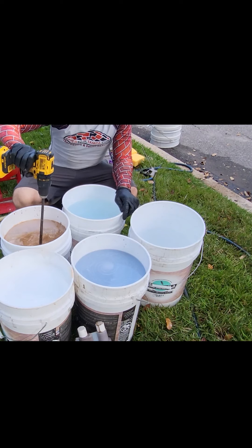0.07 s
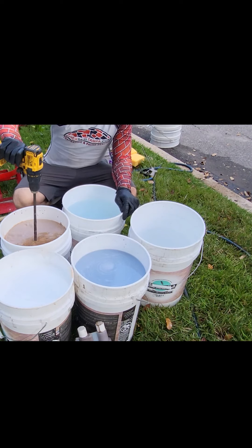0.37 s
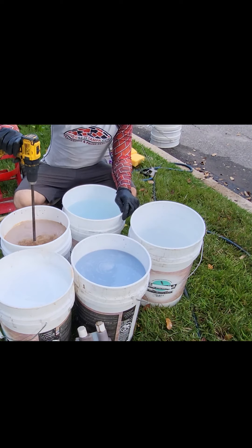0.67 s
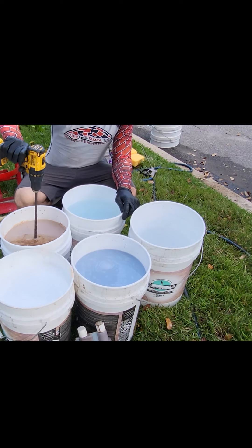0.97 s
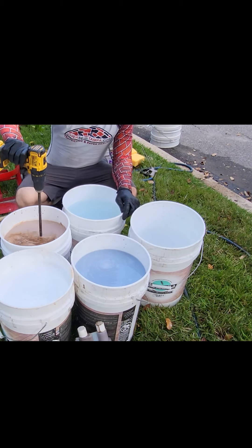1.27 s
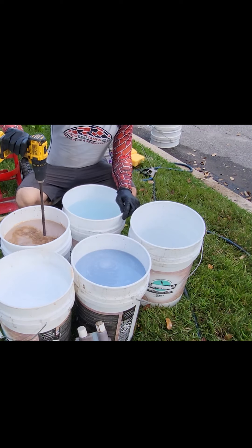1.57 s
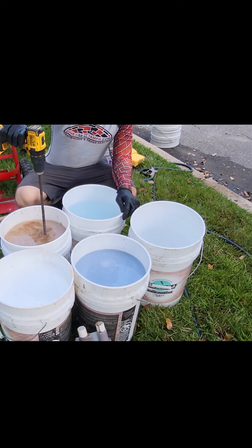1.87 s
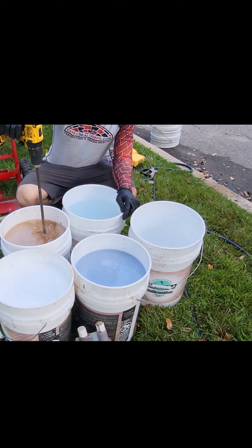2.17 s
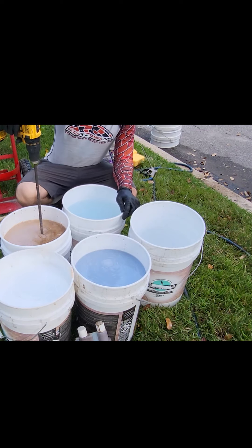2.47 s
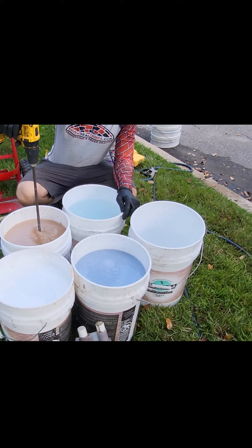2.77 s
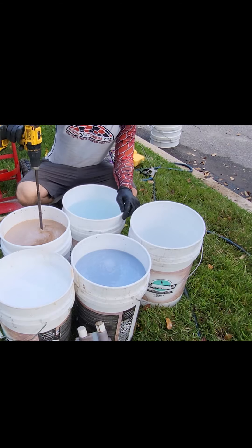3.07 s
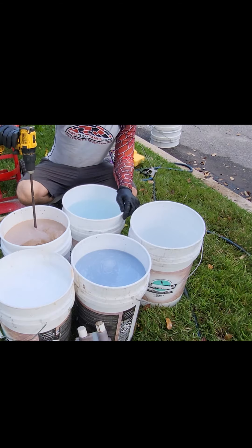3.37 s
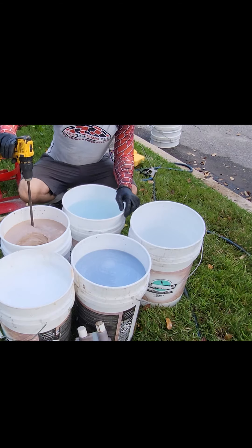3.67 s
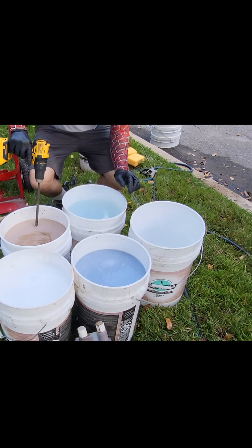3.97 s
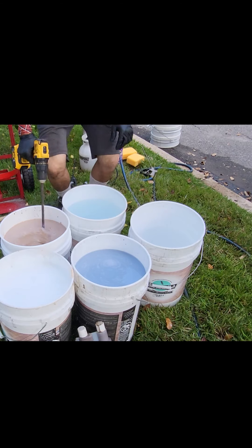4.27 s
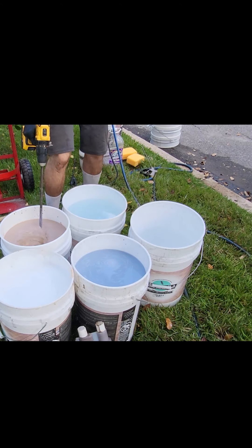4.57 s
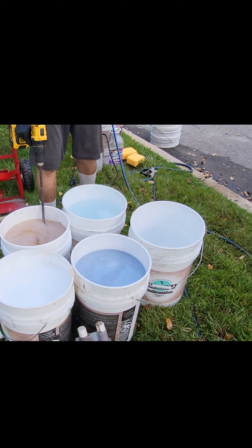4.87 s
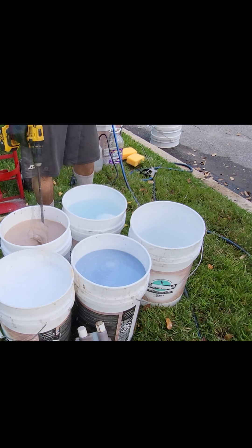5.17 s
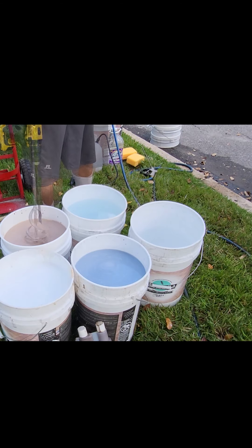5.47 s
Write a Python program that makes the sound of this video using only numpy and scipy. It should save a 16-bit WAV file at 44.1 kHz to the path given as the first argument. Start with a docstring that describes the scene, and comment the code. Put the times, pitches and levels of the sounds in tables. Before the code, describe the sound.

A cordless drill whines and rattles, stirring liquid in a plastic bucket outdoors with a few knocks, pauses briefly, then runs again.

```python
"""On a lawn, a little to the right, a cordless drill spins a paddle in a bucket of thick sealer.
Its cooling fan whines over gear teeth rattling the housing and air rushing through the vents.
Now and then the paddle bumps the plastic wall, which knocks and thuds. The trigger is let go once
and pulled again, with a few soft footfalls; then the drill breaks off, and a faint tick is left
over a low outdoor rumble."""
import sys
import numpy as np
from scipy import signal
from scipy.fft import rfft, irfft
from scipy.io import wavfile
from scipy.ndimage import uniform_filter1d

SR = 44100
rng = np.random.default_rng(int(sys.argv[2]) if len(sys.argv) > 2 else 0)


def bounce(signal):
    """Save signal as a 16-bit WAV file at the path given by the first command-line argument."""
    frames = np.transpose(np.atleast_2d(signal))
    limited = np.clip(frames, -1, 1)
    pcm = np.round(limited * 32767).astype(np.int16)
    wavfile.write(sys.argv[1], SR, pcm)


N = 247401
T = np.arange(N) / SR
F = np.maximum(np.fft.rfftfreq(N, 1 / SR), 1)


def undb(db):
    """Decibels to gain."""
    return 10 ** (np.asarray(db) / 20)


def unit(x):
    """Scale to rms 1."""
    return x / np.sqrt(np.mean(x ** 2))


def curves(table):
    """One automation lane per column, in straight lines between the times."""
    times, *columns = np.transpose(table)
    return [np.interp(T, times, column) for column in columns]


def walk(rate_hz):
    """Smooth random modulation of rms 1."""
    return unit(irfft(rfft(rng.standard_normal(N)) / (1 + (F / rate_hz) ** 4), N))


def colour(x, points, peaks=()):
    """Apply an EQ curve with resonant peaks on it, then scale to rms 1."""
    hz, db = np.transpose(points)
    lift_db = sum(lift / (1 + (2 * (F - f) / width) ** 2) for f, width, lift in peaks)
    eq_db = np.interp(np.log(F), np.log(hz), db) + lift_db
    return unit(irfft(rfft(x) * undb(eq_db), N))


def ring(x, modes):
    """Pass a sound through damped modes; white noise keeps its level."""
    response = sum(undb(db) / (1 + 1j * (F ** 2 - f ** 2) / (F * width)) for f, width, db in modes)
    return irfft(rfft(x) * response / np.sqrt(np.mean(abs(response) ** 2)), N)


def spread(direct, scatter_db):
    """Widen a sound with scattered noise that differs between the channels."""
    return unit(direct + undb(scatter_db) * rng.standard_normal((2, N)))


def pan(left_minus_right_db):
    """Left and right gains with a mean of 1."""
    left = undb(left_minus_right_db) * np.ones(N)
    return 2 * np.array([left, np.ones(N)]) / (1 + left)


def burst(start_s, length_s):
    """Contact envelope: a 2 ms attack and a bell-shaped decay."""
    age = np.maximum(T - start_s, 0)
    return np.minimum(age / .002, 1) * np.exp(-(age / length_s) ** 2)


# Trigger pulls, the first already under way:
# pulled t/s, let go t/s, gear level/dB, its drift/(dB/s), air level/dB, its drift/(dB/s), hum level/dB
TRIGGER_PULLS = [(-0.5, 3.935, -37.5, -0.4041, -47, -0.43, -77.5), (4.24, 5.6, -40, 0.6, -56, 3.5, -69)]

def drill(cut_s=5.54):
    """One motor drives every layer; gears and air grow with its speed until the sound breaks off."""
    pulls = np.array(TRIGGER_PULLS)
    latest = np.searchsorted(pulls[:, 0], T, side="right") - 1
    on_s, off_s, gear_db, gear_drift, air_db, air_drift, hum_db = pulls[latest].T
    held_s, released_s = T - on_s, np.maximum(T - off_s, 0)
    speed = motor_speed(held_s, released_s)
    turns = shaft_turns(speed)
    gear_gain = undb(gear_db + gear_drift * held_s) * speed ** .69
    airflow = uniform_filter1d(speed ** 2.3, size=2600)  # the air follows the fan softly
    air_gain = undb(air_db + air_drift * held_s + .43 * walk(2.4)) * airflow
    gears = gear_gain * (gear_rattle(turns) + gear_tones(turns))
    air = air_gain * (vent_air() + motor_whistles(turns))
    whine = fan_whine(turns, released_s)
    hum = undb(hum_db) * rotor_hum(turns, held_s)
    whistle = brake_whistle(turns, speed, released_s)
    return (whine + gears + air + hum + whistle) * (T < cut_s) + start_buzz(turns)


def motor_speed(held_s, released_s, spin_up_s=.036, brake_s=.19):
    """Share of full speed: the motor eases up on a pull and brakes ever harder once let go."""
    spin_up = (1 - np.exp(-held_s / spin_up_s)) ** 2
    return spin_up * np.clip(1 - (released_s / brake_s) ** 2, 0, 1)


def shaft_turns(speed, full_hz=453.5, sag_hz_per_s=.24, flutter=.00026, drag=.00521):
    """Turns made by the motor: it sags as the battery drains, and hard bumps slow it briefly."""
    hz = speed * (full_hz - sag_hz_per_s * T)
    jolts = sum(undb(db + 43) * burst(t, length) for t, _, _, db, length in PADDLE_HITS)
    braking = uniform_filter1d(jolts, size=1800)
    return np.cumsum(hz * (1 + flutter * walk(60) - drag * braking)) / SR


def shaft_speed(turns):
    """The turning rate as a share of its peak."""
    rate = np.gradient(turns)
    return rate / rate.max()


# Whine on the long pull, swelling and fading as the drill moves: t/s, level/dB, left minus right/dB
WHINE_FIRST_PULL = [(0.0, -32.5, -12), (0.38, -36, -7.5), (0.53, -31, -6.0), (0.81, -34.5, -1),
                    (1.06, -38.5, -11), (1.21, -33, -12), (1.54, -31.5, -1.5), (1.96, -39, 8.5),
                    (2.14, -43.5, 0), (2.3, -39, -22), (2.46, -38, -18.0), (2.64, -45, -1), (2.69, -43, 22),
                    (2.76, -35, 1), (2.84, -31, -4.5), (2.98, -30.5, -9), (3.12, -37.5, -4),
                    (3.19, -36, -12.5), (3.37, -34, -1), (3.62, -33.5, -7), (3.83, -30.5, -5),
                    (3.92, -31, -11.5)]
# Whine on the short pull: t/s, level/dB, left minus right/dB
WHINE_SECOND_PULL = [(4.39, -34.5, -8.5), (4.44, -45, -22), (4.522, -39.5, -16), (4.87, -44, -14),
                     (4.942, -42.5, 0.5), (5.336, -42, 0.5), (5.52, -37, -3.5)]

def fan_whine(turns, released_s, blades=8, waver_db=.5, roughness=.39, release_s=.06):
    """The fan blades sing one pure tone; reflections shift its phase between the channels."""
    db, pan_db = curves([*WHINE_FIRST_PULL, *WHINE_SECOND_PULL])
    speed = shaft_speed(turns)
    phase = 2 * np.pi * blades * turns + walk(.8) * np.array([[.35], [-.35]])
    # below full speed the motor judders and the tone turns rough
    judder = roughness * np.clip(20 * (1 - speed), 0, 1)
    tone = np.sin(phase + judder * walk(88)) * (1 + judder * walk(100))
    # a slow fan hardly sings, and the tone dies soon after the trigger is let go
    strength = abs(speed) ** 7 * np.exp(-(released_s / release_s) ** 2)
    return np.sqrt(2) * tone * strength * undb(db + waver_db * walk(18)) * pan(pan_db)


# Raw tone of the tooth impacts: f/Hz, level/dB
RATTLE_EQ = [(150, -56), (480, -21.5), (720, -12), (900, -3.5), (1700, -4), (2400, 2), (2900, -3),
             (4200, -5), (6200, -22.5), (7000, -32), (9000, -48), (16000, -27)]
# Resonances of the drill housing: f/Hz, width/Hz, lift/dB
HOUSING_MODES = [(978.6, 86, 9.5), (1234.4, 71, 14.5), (1387, 287, 8.5), (1566, 176, 11.5), (1950, 127, 7),
                 (2258, 334, 7.5), (3490, 250, 4), (4810, 160, 10.5), (5630, 210, 19)]
# Gain ride on the housing ring near 980 Hz: t/s, level/dB
LOW_RING_RIDE = [(0, 1.5), (.6, 1), (5.0, -1.5), (5.4, 6.5)]
# Gain ride on the housing ring near 1570 Hz: t/s, level/dB
UPPER_RING_RIDE = [(0, -3), (.6, 5.5), (1.4, 3.5), (1.9, 0), (3.9, -2), (5.1, 1.5), (5.5, -0.5)]

def gear_rattle(turns, turns_per_carrier=5.1, throb_db=.34, shade_db=-9):
    """Dense tooth impacts, pulsing once a turn of the planet carrier, ring the housing."""
    impacts = (rng.random(N) < .3) * rng.standard_normal(N)
    carrier = 1 + .054 * np.sin(2 * np.pi * turns / turns_per_carrier)
    spectrum = rfft(colour(spread(unit(impacts), -5) * carrier, RATTLE_EQ, HOUSING_MODES))
    spectrum[0] *= undb(shade_db * F ** 2 / (F ** 2 + 3400 ** 2))  # the left is shaded from the treble
    rattle = irfft(spectrum, N)
    # three rings come and go; the middle one gives way as the upper one rises
    (low_db,), (upper_db,) = curves(LOW_RING_RIDE), curves(UPPER_RING_RIDE)
    for mode, db in (0, low_db), (1, -1 - upper_db), (3, upper_db):
        hz, width, _ = HOUSING_MODES[mode]
        band = irfft(spectrum * np.exp(-(2 * (F - hz) / width) ** 2), N)
        rattle += (undb(db - .04 * walk(5.2)) - 1) * band
    return unit(rattle) * undb(throb_db * walk(25)) * pan(-2.5)


def shaft_tones(turns, orders, pan_db, waver_db=3.5, wander_rad=.12):
    """Partials locked to the shaft, each wavering alone; they stand out only near full speed."""
    tones = np.zeros(N)
    for order, db in orders:
        gain = undb(db + waver_db * walk(5.7))
        tones += gain * np.sin(2 * np.pi * order * turns + wander_rad * walk(37))
    return np.sqrt(2) * tones * shaft_speed(turns) ** 30 * pan(pan_db)


# Harmonic gear tones: multiple of the shaft rate, level/dB relative to the rattle
GEAR_HARMONICS = [(3, -13), (4, -19), (6, -19.5)]
# Inharmonic mesh tones: multiple of the shaft rate, level/dB relative to the rattle
MESH_PARTIALS = [(2.122, -25.5), (2.72, -21.5), (3.127, -47)]

def gear_tones(turns):
    """The meshing gears add a weak pitched layer to the rattle."""
    harmonics = shaft_tones(turns, GEAR_HARMONICS, pan_db=-3.5)
    return harmonics + shaft_tones(turns, MESH_PARTIALS, pan_db=-15, wander_rad=.6)


# Bright rush of the vents: f/Hz, level/dB
VENT_EQ = [(2000, -33), (4200, 0), (5200, 4.5), (5700, 11.5), (6500, 5.5), (7500, -1.5), (9000, -12),
           (10300, 0), (11800, 3.5), (12700, 4), (13400, 5.5), (14300, 4), (15300, 10.5), (16000, -28)]

def vent_air(gain_db=3, flicker_db=1.07):
    """Cooling air hisses through the vents."""
    hiss = colour(spread(rng.standard_normal(N), 5), VENT_EQ)
    return hiss * undb(gain_db + flicker_db * walk(30)) * pan(-8)


# Thin motor whistles: multiple of the shaft rate, level/dB relative to the air's gain
WHISTLE_PARTIALS = [(12.55, -23), (13.635, -16), (16, -18), (20, -16), (21, -5), (32, -20)]

def motor_whistles(turns):
    """The motor whistles high up in the rushing air."""
    return shaft_tones(turns, WHISTLE_PARTIALS, pan_db=-17, wander_rad=.2)


def brake_whistle(turns, speed, released_s, db=-44, waver_db=4.5):
    """One thin whistle of the motor stays on and falls as it brakes."""
    order, _ = WHISTLE_PARTIALS[1]
    tone = np.sin(2 * np.pi * order * turns + .4 * walk(80))
    envelope = np.minimum(released_s / .02, 1) * speed ** 16
    return tone * envelope * undb(db + waver_db * walk(30)) * pan(-8)


def rotor_hum(turns, held_s, start_db=12, settle_s=.38):
    """The unbalanced rotor shakes the housing about once a turn, hardest just after it starts."""
    hum = shaft_tones(turns, [(.98, 0)], pan_db=-4.5, waver_db=3, wander_rad=.35)
    return hum * undb(start_db * np.exp(-held_s / settle_s))


def start_buzz(turns, start_s=4.244, length_s=.1, db=-48):
    """The motor buzzes as it restarts, and its gear tone sweeps up through the housing resonance."""
    chirp = undb(-9) * np.sin(2 * np.pi * 21 * turns)
    drive = (spread(rng.standard_normal(N), -3) + chirp) * burst(start_s, length_s)
    buzz = ring(drive, [(3320, 110, 0), (3650, 310, 4)])
    return signal.sosfilt(signal.butter(4, 5000, fs=SR, output="sos"), buzz) * undb(db) * pan(-8)


def brief_hiss(turns, start_s=1.1, end_s=1.503, fade_s=.049, db=-39):
    """A bright hiss with a thin motor whistle in it opens on the right for a moment."""
    gate = np.clip(np.minimum(T - start_s, end_s - T) / fade_s, 0, 1)
    eq = [(2000, -17), (5000, 17.5), (7000, 14.5), (10500, 8), (12500, 14), (16000, -12)]
    hiss = colour(rng.standard_normal(N), eq)
    whistle = shaft_tones(turns, [(21, -11)], pan_db=0, waver_db=2, wander_rad=.2)
    return (hiss + whistle) * gate * undb(db) * np.array([[0], [1]])


# Paddle against the bucket: t/s, ring level/dB, scrape length/s, thud level/dB, thud length/s
PADDLE_HITS = [(0.031, -30.5, 0.0062, -42, 0.042), (0.092, -36, .005, -56, 0.031),
               (0.15, -31.5, 0.0082, -49.5, 0.087), (0.218, -32, 0.0058, -49.5, 0.024),
               (0.286, -35.5, 0.013, -53.5, 0.042), (1.203, -38, 0.044, -49, 0.041),
               (3.695, -35, 0.021, -45.5, 0.042), (3.703, -42, 0.007, -40.5, 0.008),
               (3.797, -37, 0.0045, -46.5, 0.068), (3.818, -31.5, 0.015, -48, 0.038),
               (3.931, -29, 0.011, -38.5, 0.026), (3.95, -34, 0.022, -37.5, 0.022),
               (3.991, -34, 0.019, -38.5, 0.049), (4.051, -38, 0.019, -48, 0.052),
               (4.081, -37, 0.023, -45, 0.017), (4.288, -46, 0.0068, -44, 0.011),
               (4.771, -52, 0.011, -55.5, 0.027)]
# Dull body of the wall, loaded by the liquid: f/Hz, width/Hz, level/dB
BUCKET_WALL = [(217, 25, -20.5), (294, 5.9, -1.5), (401, 20, 1), (469, 52, 9), (568, 50, 4)]
# Hollow ring of the free rim: f/Hz, width/Hz, level/dB
BUCKET_RIM = [(933, 27, 8), (1002, 46, 15), (1340, 140, -14), (1414, 85, 15.5), (1890, 100, 5),
              (3000, 1300, -10.5)]

def paddle_bumps(strike_gain=13, thud_db=-1, boom_db=-5.5):
    """The paddle strikes and scrapes the bucket: the rim rings briefly, the loaded wall thuds longer."""
    rim_force = sum(undb(db) * burst(t, length) for t, db, length, _, _ in PADDLE_HITS)
    wall_force = sum(undb(db) * burst(t, length) for t, _, _, db, length in PADDLE_HITS)
    strikes = np.zeros(N)
    for t, db, *_ in PADDLE_HITS:
        strikes[int(t * SR)] = strike_gain * undb(db)
    scrape = spread(rng.standard_normal(N), -6)
    # the strike itself finds only the two lowest rim modes
    knock = ring(scrape * rim_force, BUCKET_RIM) + ring(strikes, BUCKET_RIM[:2])
    thud = undb(thud_db) * ring(scrape * wall_force, BUCKET_WALL[2:])
    # only the hardest pushes move the whole bucket in its two deepest modes
    boom = undb(boom_db) * ring(scrape * wall_force ** 2 / wall_force.max(), BUCKET_WALL[:2])
    liquid_cushion = signal.butter(2, [180, 3800], "band", fs=SR, output="sos")
    return signal.sosfilt(liquid_cushion, knock + thud + boom) * pan(-3.5)


def chuck_clatter(gain_db=-6):
    """Each hard bump rattles the shaft in the chuck, ringing the top housing modes."""
    jolts = sum(undb(db) * burst(t, length) for t, _, length, db, _ in PADDLE_HITS)
    clatter = ring(spread(rng.standard_normal(N), 5) * jolts, HOUSING_MODES[-3:])
    return clatter * undb(gain_db) * pan(-5)


# Light ticks of the tool at rest: t/s, level/dB, length/s
IDLE_TICKS = [(4.115, -56, 0.025), (4.164, -53, 0.0095), (5.577, -42, 0.0054), (5.583, -61, 0.0095)]
# Their ring: f/Hz, width/Hz, level/dB
TICK_RING = [(1390, 91, 28.5), (2670, 450, 11), (3440, 430, 11), (5400, 700, -61)]

def tool_ticks():
    """Small knocks briefly ring the idle tool."""
    force = sum(undb(db) * burst(t, length) for t, db, length in IDLE_TICKS)
    knocks = ring(spread(rng.standard_normal(N), -6) * force, TICK_RING)
    return signal.sosfilt(signal.butter(6, 5800, fs=SR, output="sos"), knocks) * pan(-3)


# Soft steps on the grass: t/s, level/dB, length/s
FOOTFALLS = [(4.313, -50, 0.029), (4.384, -44.5, 0.061), (4.708, -49.5, 0.056)]

def footsteps():
    """Feet land on the lawn with dull, low thumps."""
    force = sum(undb(db) * burst(t, length) for t, db, length in FOOTFALLS)
    eq = [(40, -25), (95, 6), (125, 13), (190, -50), (500, -55), (3000, -90)]
    return colour(rng.standard_normal(N), eq) * force


# Low bed of still outdoor air: f/Hz, level/dB
RUMBLE_EQ = [(15, -12), (28, 1), (42, -0.5), (62, 6.5), (95, 0.5), (130, -2), (200, -14.5), (400, -20),
             (1000, -39), (2500, -26.5), (5500, -39.5), (8000, -75), (16000, -49)]

def outdoors(rumble_db=-56, swell_db=1.94, drone_hz=91, drone_db=-64, air_db=-62.5):
    """A distant rumble swells at random, with a faint drone in it and wide, soft air around it."""
    rumble = colour(rng.standard_normal(N), RUMBLE_EQ) * undb(rumble_db + swell_db * walk(4.2))
    drone = np.sqrt(2) * np.sin(2 * np.pi * drone_hz * T + 1.15 * walk(3.6))
    drone *= undb(drone_db + 2 * walk(8.3))
    air_eq = [(30, 1.5), (300, 0), (1500, 3), (5500, -15), (8000, -39.5), (12000, -52)]
    air = colour(rng.standard_normal((2, N)), air_eq) * undb(air_db)
    return (rumble + drone + air) * pan(-.8)


def treble_scoop(x, hz=8800, width_hz=2100, db=-18):
    """A broad hollow in the treble."""
    return irfft(rfft(x) * undb(db * np.exp(-((F - hz) / width_hz) ** 2)), N)


def scene():
    """Drill, bucket and garden; only the brief hiss bypasses the treble scoop."""
    mix = drill() + paddle_bumps() + chuck_clatter() + tool_ticks() + footsteps() + outdoors()
    return treble_scoop(mix) + brief_hiss(shaft_turns(speed=1))


def record(dry, lag_samples=.9, top_hz=15700):
    """The right channel arrives a little later, and a steep low-pass cuts the top."""
    lag = np.exp(-2j * np.pi * F / SR * np.array([[0], [lag_samples]]))
    lowpass = signal.ellip(10, .2, 80, top_hz, fs=SR, output="sos")
    return signal.sosfilt(lowpass, irfft(rfft(dry) * lag, N))


dry = scene()
out = record(dry)
bounce(out)
```